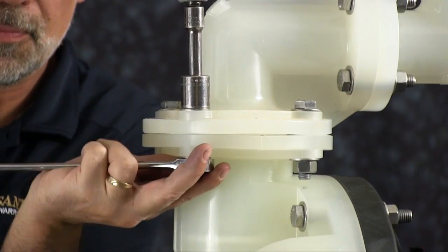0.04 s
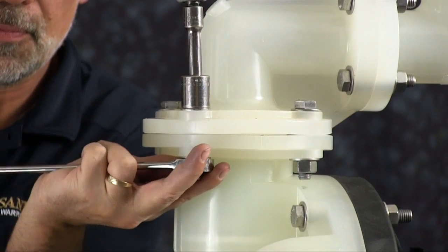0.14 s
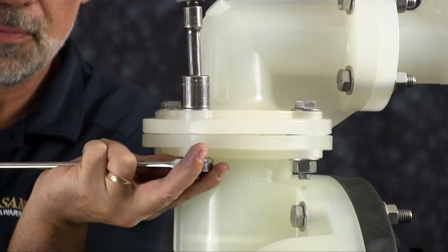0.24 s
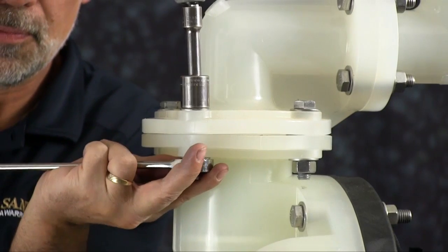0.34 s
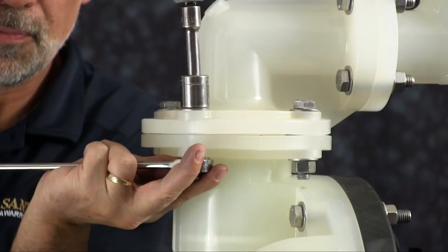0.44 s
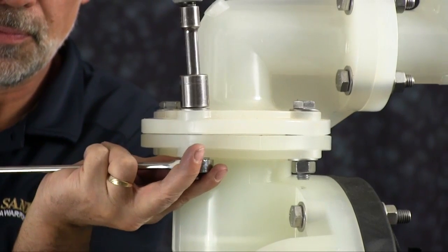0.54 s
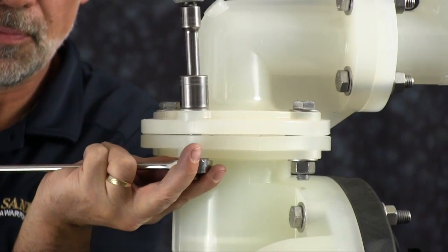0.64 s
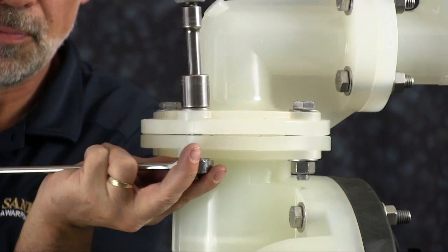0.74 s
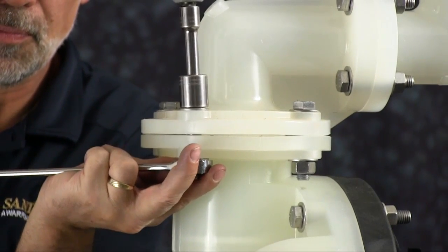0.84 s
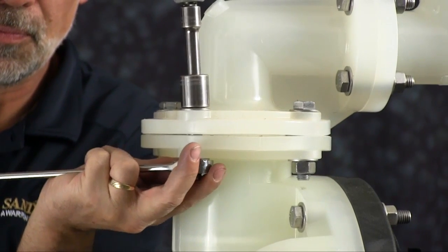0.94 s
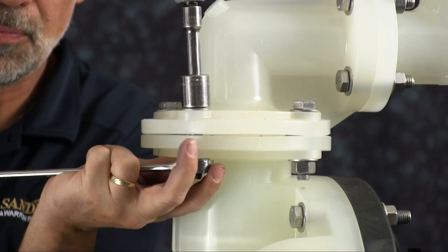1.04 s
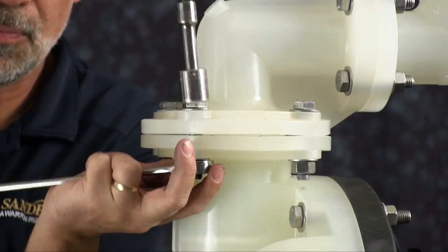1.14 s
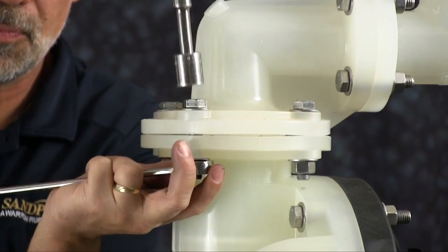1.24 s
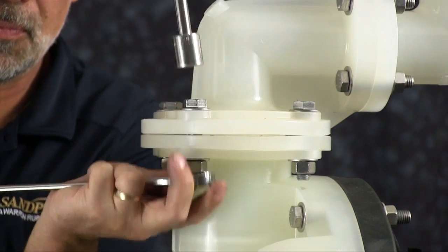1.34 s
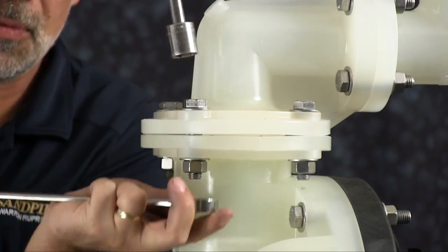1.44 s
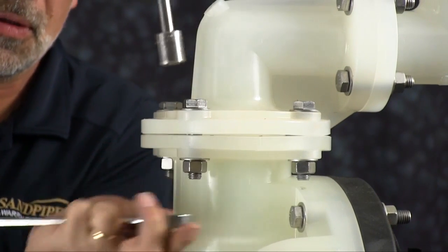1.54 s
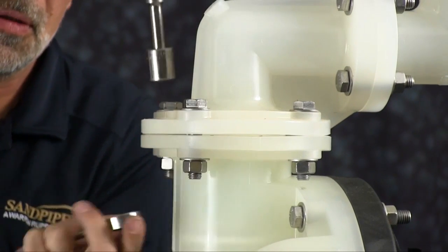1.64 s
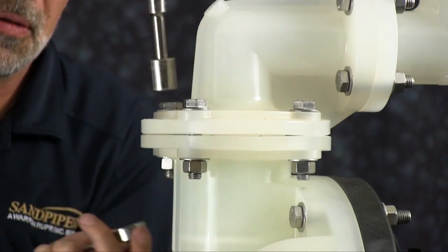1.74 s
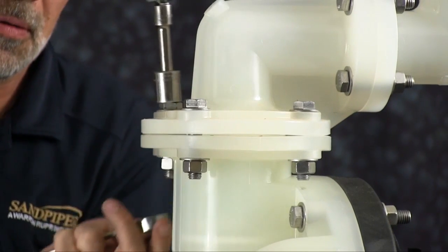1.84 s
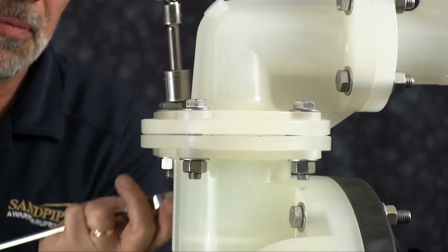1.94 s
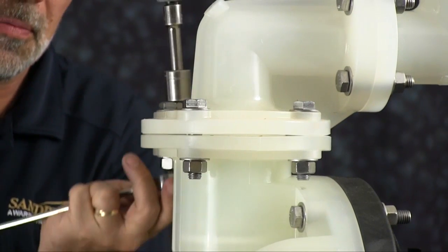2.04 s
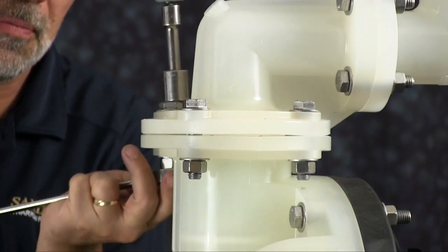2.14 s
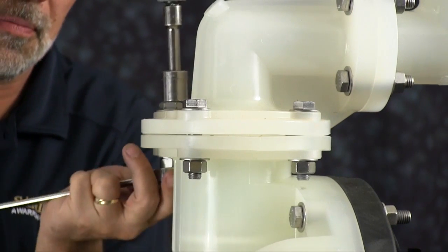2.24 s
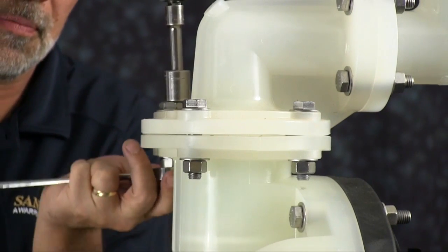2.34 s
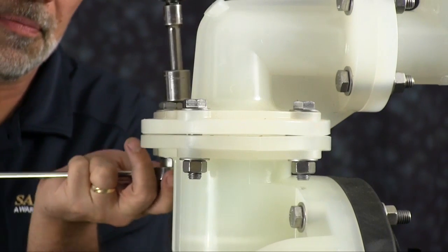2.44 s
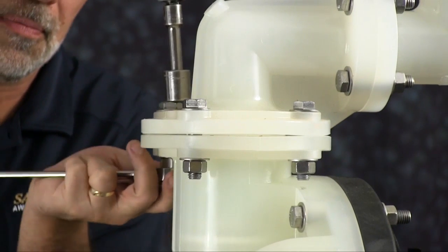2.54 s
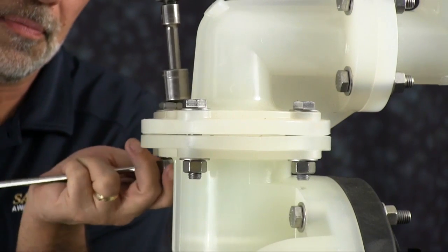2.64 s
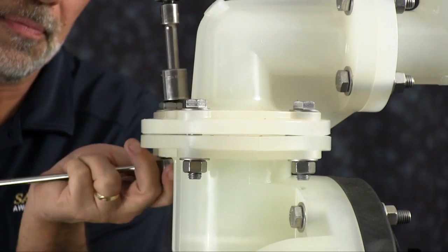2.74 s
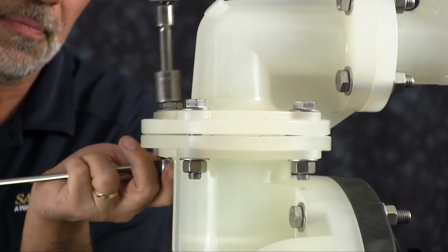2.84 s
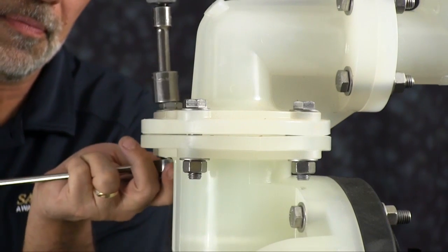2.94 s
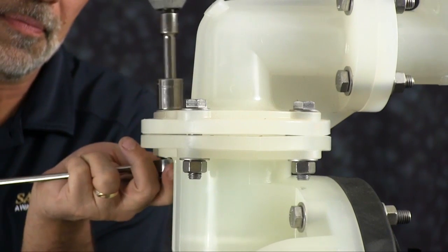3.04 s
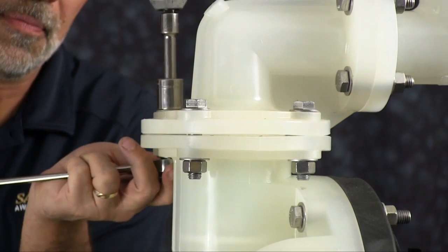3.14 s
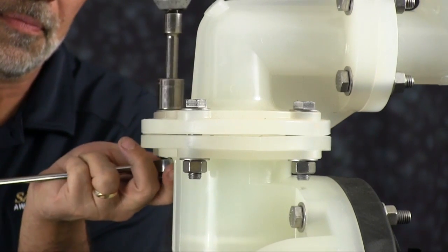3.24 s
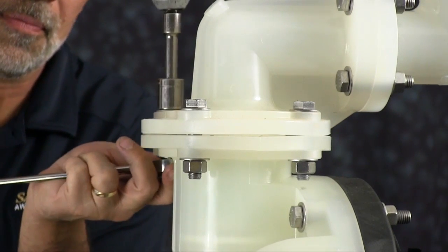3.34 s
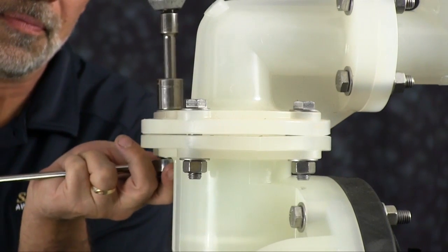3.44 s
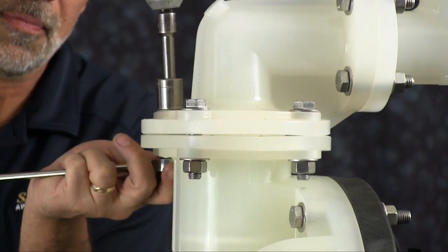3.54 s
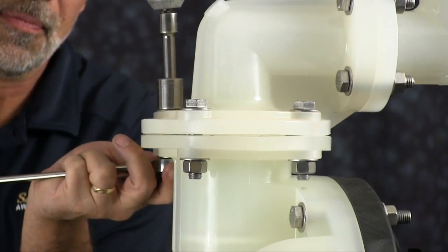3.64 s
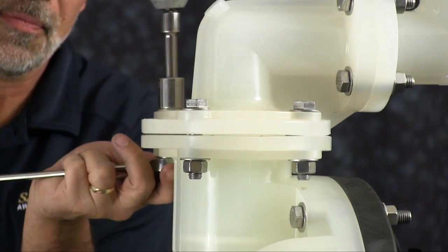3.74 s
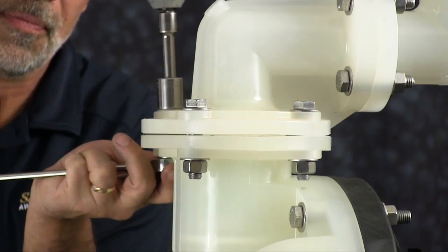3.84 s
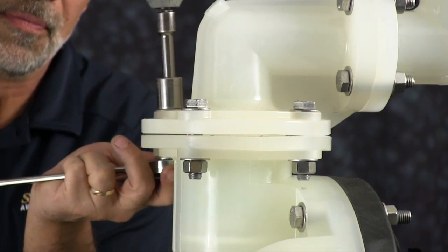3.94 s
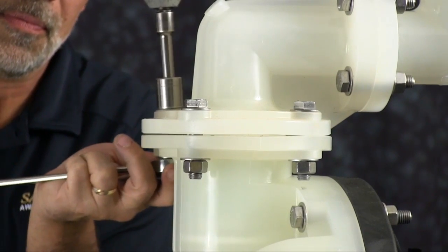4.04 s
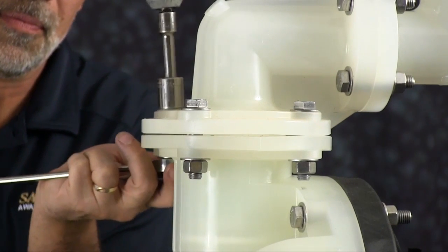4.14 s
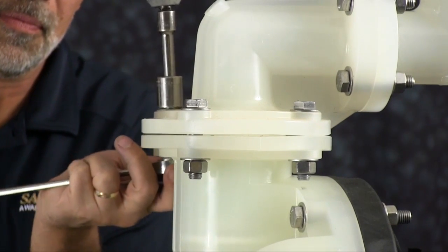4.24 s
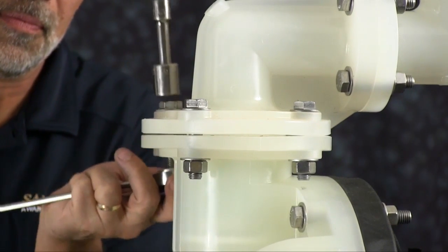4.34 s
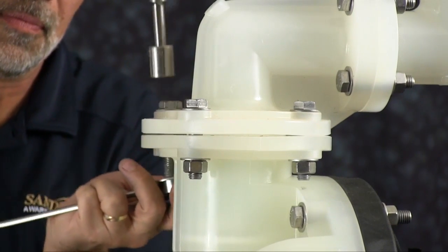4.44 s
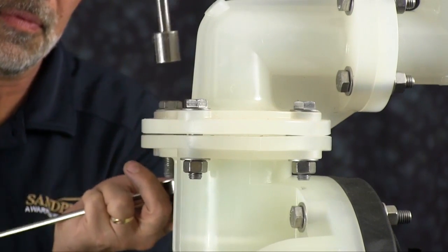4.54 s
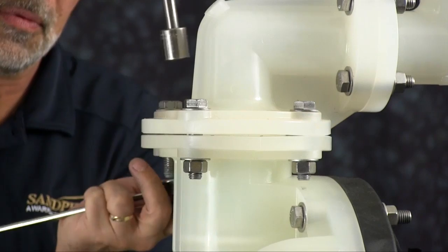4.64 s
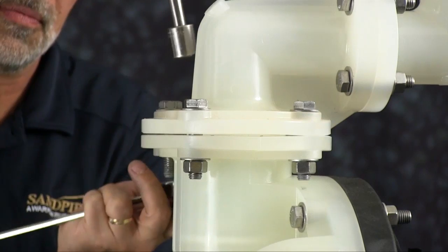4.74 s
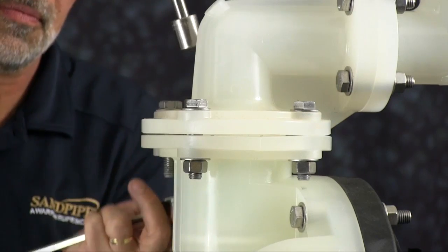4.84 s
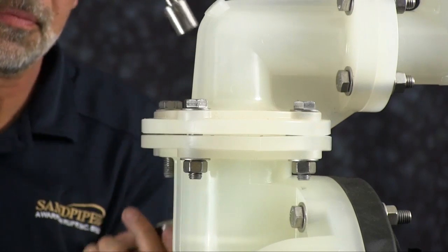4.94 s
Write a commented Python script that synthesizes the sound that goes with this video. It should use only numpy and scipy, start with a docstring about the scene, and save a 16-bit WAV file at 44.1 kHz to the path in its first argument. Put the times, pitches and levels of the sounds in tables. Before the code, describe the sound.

A small workshop, heard close, with faint bass rumble and short echo. A brief scrape and dull steel knocks come at 0-0.4 s. From about 0.4 s a cordless impact wrench rattles and hammers around 45 blows per second, loud, hard and metallic, ringing through the socket and plastic housing. After 0.74 s the beat breaks into irregular clanging blows over gear rattle and a faint whine, stopping just after 1.0 s. Light taps follow, then a strong hollow plastic thunk near 1.98 s and a spanner clink at 2.2 s. Small fumbling touches lead to a cluster of knocks and short scrapes at 2.75-3.2 s. At 3.58 s the wrench hammers again, more briefly, until 3.83 s, then spins with rattle, a few snags and a more audible high whine that sinks after 4.15 s. Knocks and tiny bright clinks at 4.3-4.55 s fade into quiet rumble.

```python
"""Knocks of steel on steel come first, over the faint rumble of a small workshop.
Then a cordless impact wrench loosens two bolts on the flange of a plastic pump. Twice it rattles, hammers
about 45 times a second, and whines and rattles as the nut spins off. In between, socket and spanner knock,
scrape and clink. Blows and knocks are short noise bursts, rattle and scrapes are crowds of tiny random
contacts, the whine and the clinks are sines, and steel and plastic are sets of resonances."""
import sys
import numpy as np
from scipy import signal
from scipy.fft import rfft, irfft, next_fast_len
from scipy.io import wavfile
from scipy.ndimage import uniform_filter1d, minimum_filter1d

SR = 44100
rng = np.random.default_rng(int(sys.argv[2]) if len(sys.argv) > 2 else 0)


def transcribe(u):
    """Save the signal u as a 16-bit wav file named by the first command-line argument.

    u: samples, shape (n,) or (channels, n), limited to [-1, 1]; the rate is SR.
    q: integer samples, one column per channel.
    """
    v = np.clip(np.atleast_2d(u).T, -1, 1)
    q = np.round(v * 32767).astype(np.int16)
    wavfile.write(sys.argv[1], SR, q)


N = 220639
TIME = np.arange(N) / SR   # seconds


def from_db(db):
    """Turn decibels into a gain."""
    return 10 ** (np.asarray(db) / 20)


def rms_one(x):
    """Scale a sound to an rms level of 1."""
    return x / np.sqrt(np.mean(x ** 2) + 1e-20)


def at_hz(points, hz):
    """Read a table between its points, along a logarithmic pitch axis."""
    table = np.array(points)
    return np.interp(np.log(np.maximum(hz, 1)), np.log(table[:, 0]), table[:, 1])


def colour(x, spectrum):
    """Give a sound a spectrum with a minimum-phase filter, which never sounds before its input."""
    size = 2 * next_fast_len(x.shape[-1])
    hz = np.arange(size // 2 + 1) * SR / size
    cepstrum = irfft(np.log(from_db(at_hz(spectrum, hz))))
    # folding the cepstrum onto its first half makes the filter minimum-phase
    cepstrum[1:size // 2] *= 2
    cepstrum[size // 2 + 1:] = 0
    response = np.exp(rfft(cepstrum))
    return irfft(rfft(x, size) * response)[..., :x.shape[-1]]


def resonance(x, hz, width_hz):
    """Ring at one pitch with gain 1 on top; a narrower resonance rings longer."""
    r = np.exp(-np.pi * width_hz / SR)
    feedback = [1, -2 * r * np.cos(2 * np.pi * hz / SR), r * r]
    return (1 - r * r) / 2 * signal.lfilter([1, 0, -1], feedback, x + 1e-18)


def body(force, modes):
    """An object passes on whatever shakes it and rings along."""
    return force + sum(from_db(level_db) * resonance(force, hz, width_hz) for hz, width_hz, level_db in modes)


def add(out, s, sound):
    """Mix a short sound in at time s."""
    at = max(round(s * SR), 0)
    out[at:at + len(sound)] += sound[:N - at]


def gate(start, end, fade_s):
    """1 between start and end, with sloping edges outside."""
    return np.interp(TIME, [start - fade_s, start, end, end + fade_s], [0, 1, 1, 0])


def since(s):
    """Seconds gone by since time s, 0 before it."""
    return np.maximum(TIME - s, 0)


def held(start, end, attack_s, release_s):
    """Rise in a straight line, hold, then fall off in a rounded curve."""
    return np.minimum(since(start) / attack_s, 1) * np.exp(-(since(end) / release_s) ** 2)


def wander(size):
    """Slow random drift of spread 1, averaged over size samples."""
    return rms_one(uniform_filter1d(rng.standard_normal(N), size=size))


def turning(hz, waver):
    """Angle of a shaft whose speed is slightly unsteady."""
    return 2 * np.pi * np.cumsum(hz * (1 + waver * wander(size=200))) / SR


def grains(per_s, spread_db):
    """Random tiny contacts of uneven strength and either sign."""
    strength_db = spread_db * np.minimum(rng.exponential(1, N), 4)
    sizes = from_db(strength_db) * rng.choice([-1, 1], N)
    return sizes * (rng.random(N) < per_s / SR)


def bursts(spectrum, decay_s, count, snap=0.57, size=2048):
    """One sharp snap and a fast-dying crowd of vibrations per contact, all rows of the same energy."""
    fade = np.exp(-np.arange(size) / SR / decay_s)
    dying = rng.standard_normal((count, size)) * fade
    dying[:, 0] = snap * np.linalg.norm(dying, axis=1)
    rows = colour(dying, spectrum)
    return rows / np.sqrt(np.sum(rows ** 2, axis=1, keepdims=True) / (SR * decay_s))


# the bright crack of steel on steel: pitch_hz [Hz], relative level_db [dB]
CRACK_SPECTRUM = [(1500, -21.5), (3000, -11), (4500, 7.5), (6000, 2.5), (8000, -3), (11000, -8),
                  (13500, -18.5), (16000, -30)]


def strikes(rows, thud_spectrum, thud_s, thud_db, crack_s, crack_db, delay_s):
    """Each contact is a thud with a crack of steel on steel; it starts delay_s after the time in its row."""
    out = np.zeros(N)
    thuds = bursts(thud_spectrum, thud_s, count=len(rows))
    cracks = bursts(CRACK_SPECTRUM, crack_s, count=len(rows))
    for (s, level_db, treble_db, *_), thud, crack in zip(rows, thuds, cracks):
        contact = from_db(thud_db) * thud + from_db(treble_db + crack_db) * crack
        add(out, s + delay_s, from_db(level_db) * contact)
    return out


# the faint rumble of the room: pitch_hz [Hz], relative level_db [dB]
RUMBLE_SPECTRUM = [(12, -33), (20, -1.5), (65, 2), (104, -2.5), (193, -10.5), (319, -18.5), (698, -29.5),
                   (923, -31), (1150, -34), (1810, -35.5), (2390, -43), (2600, -43.5), (3840, -47),
                   (14700, -52.5), (16000, -55.5)]


def room_rumble(level_db=-39):
    """Steady noise, strongest in the bass."""
    return from_db(level_db) * rms_one(colour(rng.standard_normal(N), RUMBLE_SPECTRUM))


# how long the workshop echoes: pitch_hz [Hz], time to fall by 60 dB t60_s [s]
ROOM_DECAY = [(150, 1), (700, 0.53), (2000, 0.33), (5500, 0.29), (14000, 0.31)]


def workshop(x, build_s=0.009, size=26000):
    """The room scatters sound into a tail of noise that dies at its own pace in each pitch band."""
    t, tail = np.arange(size) / SR, 0
    edges = np.geomspace(60, 17000, 9)   # Hz
    for low, high in zip(edges, edges[1:]):
        band_filter = signal.butter(2, [low, high], "band", fs=SR, output="sos")
        band = signal.sosfilt(band_filter, rng.standard_normal(size))
        t60_s = at_hz(ROOM_DECAY, np.sqrt(low * high))
        tail = tail + band * from_db(-60 * t / t60_s)
    tail = tail * (1 - np.exp(-t / build_s))   # the echoes need a moment to build up
    return signal.fftconvolve(x, tail / np.linalg.norm(tail))[:N]


# the spanner touches or leaves the nut: start_s [s], level_db [dB], pitch_hz around which it rings most [Hz]
SPANNER_CLINKS = [(2.212, -40.5, 4140), (4.335, -53, 10800), (4.453, -59, 10800), (4.495, -52, 10010),
                  (4.53, -50, 8480)]
# ways the spanner can ring: pitch_hz [Hz], level_db against the clink [dB], time to fall by 60 dB t60_s [s]
SPANNER_MODES = [(3052, -6, .15), (3600, -14, 0.34), (3690, 18.5, 0.038), (3920, -5, 0.1),
                 (5330, -0.5, 0.18), (5380, 4, 0.11), (7865, -8, 0.34), (10230, -17, 0.23),
                 (10440, -11, 0.17)]


def spanner(octave_db=55, size=22050):
    """The spanner rings in dying sines; each touch favours those near its own pitch."""
    out, t = np.zeros(N), np.arange(size) / SR
    for s, level_db, centre_hz in SPANNER_CLINKS:
        for hz, mode_db, t60 in SPANNER_MODES:
            height_db = level_db + mode_db - octave_db * np.log2(hz / centre_hz) ** 2
            add(out, s, from_db(height_db - 60 * t / t60) * np.sin(2 * np.pi * hz * t))
    return out


# steel slides over a bolt head: start_s [s], end_s [s], level_db [dB], brightest pitch_hz [Hz]
SCRAPE_TIMES = [(0.0, 0.01, -33.5, 1508), (1.457, 1.498, -54.5, 2470), (2.754, 2.776, -40.5, 1780),
                (2.953, 2.978, -42.5, 1790), (3.098, 3.16, -39.5, 1700), (3.121, 3.133, -37.5, 3694)]
# the sound of sliding: pitch_hz [Hz], relative level_db [dB]
SLIDING_SPECTRUM = [(150, -23), (700, 6.5), (1500, 0), (3500, -8.5), (6000, -14.5), (12000, -34.5)]


def scrapes(width_hz=1500):
    """Sliding steel catches and slips many times over."""
    slips = colour(grains(per_s=860, spread_db=1), SLIDING_SPECTRUM)
    out = np.zeros(N)
    for start, end, level_db, hz in SCRAPE_TIMES:
        scrape = rms_one(resonance(slips, hz, width_hz))
        out += from_db(level_db) * gate(start, end, fade_s=0.013) * scrape
    return out


# a rebound is weaker and duller than its knock
REBOUND_DB, REBOUND_TREBLE_DB = -4, -5.5
# a shaken flange makes the loose bolt chatter: gap between touches, level, loss per touch
CHATTER_S, CHATTER_DB, CHATTER_LOSS_DB = 0.041, -18, 4
# stray touches while the tools change bolts
FUMBLE_FROM_S, FUMBLE_TO_S, FUMBLE_DB = 2.4, 2.6, -44.5
# any light touch: share of treble, share that reaches the plastic
LIGHT_TREBLE_DB, LIGHT_PLASTIC_DB = -24, -10.5
# socket and spanner knock on bolt and flange: start_s [s], level_db [dB], share of treble treble_db [dB],
# share that reaches the plastic plastic_db [dB], gap before a rebound rebound_s [s, 0 for none]
TOOL_KNOCKS = [(0.013, -11, -27, -13.5, 0), (0.03, -18.5, -9, -12.5, 0.02),
               (0.219, -36.5, -45, -20, 0.0013), (0.361, -17, -23.5, -22.5, 0.025),
               (0.399, -11, -30, -18.5, 0), (1.207, -29, -21, -25, 0.002), (1.544, -40, -31, -15, 0),
               (1.766, -28.5, -22.5, -23.5, 0), (1.977, -8.5, -18, 4.5, 0.007), (2.174, -23.5, -33, 5, 0),
               (2.212, -18, -12.5, -12, 0.024), (2.471, -28, -34, -15.5, 0.028),
               (2.633, -36.5, -34, -13, 0), (2.752, -26, -42, -23, 0.0011),
               (2.777, -19.5, -24, -2.5, 0.0069), (2.94, -27.5, -39.5, -14, 0.0028),
               (2.989, -24.5, -3.5, -22, 0), (2.995, -8.5, -16.5, -13.5, 0.0052),
               (3.097, -24.5, -29, -6, 0.0022), (3.142, -14, -20.5, -16.5, 0.011),
               (3.17, -16, -22, -16, 0.00072), (3.211, -20, -25.5, -25, 0.00085),
               (3.345, -29, -26, -20, 0.019), (3.56, -19, -31, -16.5, 0.00029), (3.574, -11.5, -28, -13, 0),
               (4.331, -24.5, -25, -29, 0.002), (4.438, -16.5, -17, -7, 0.014)]


def contacts(count=8):
    """Knocks, rebounds, chatter and a few stray touches: (start_s, level_db, treble_db, plastic_db)."""
    rows = []
    for s in rng.uniform(FUMBLE_FROM_S, FUMBLE_TO_S, count):
        rows.append((s, FUMBLE_DB + 2 * rng.standard_normal(), LIGHT_TREBLE_DB, LIGHT_PLASTIC_DB))
    for s, level_db, treble_db, plastic_db, rebound_s in TOOL_KNOCKS:
        rows.append((s, level_db, treble_db, plastic_db))
        if rebound_s > .003:   # shorter gaps get no rebound of their own
            rows.append((s + rebound_s, level_db + REBOUND_DB,
                         treble_db + REBOUND_TREBLE_DB, LIGHT_PLASTIC_DB))
        for k in range(1, 4):
            chatter_db = level_db + plastic_db + CHATTER_DB - k * CHATTER_LOSS_DB
            rows.append((s + k * CHATTER_S, chatter_db, LIGHT_TREBLE_DB, LIGHT_PLASTIC_DB))
    return rows


# the dull part of a knock: pitch_hz [Hz], relative level_db [dB]
KNOCK_SPECTRUM = [(80, -15.5), (170, -3.5), (350, -11), (750, -4.5), (1200, 3.5), (1900, -3.5),
                  (2800, -5.5), (4000, -15), (8000, -53.5)]


def knocks(touches):
    """Steel lands on steel with a short thud and crack."""
    return strikes(touches, KNOCK_SPECTRUM, thud_s=0.0056, thud_db=-13.0,
                   crack_s=0.0052, crack_db=-10, delay_s=0.00083)


# resonances of the flange when steel lands on it: pitch_hz [Hz], width_hz [Hz], level_db [dB]
FLANGE_MODES = [(155, 19, 7.5), (293, 57, -3.5), (708, 14, 8), (738, 28, 14), (855, 38, 4), (1850, 110, 5),
                (1760, 80, 4.5), (2546, 100, -10.5)]


def thunks(touches, push_db=21, contact_s=.0001):
    """A knock on the flange gives it one soft push, and the plastic answers with a hollow thunk."""
    force, push = np.zeros(N), np.exp(-np.arange(128) / SR / contact_s)
    for s, level_db, _, plastic_db in touches:
        add(force, s, from_db(level_db + plastic_db + push_db) * push / push.sum())
    return body(force, FLANGE_MODES) - force   # only the ringing, without the push itself


# resonances of the plastic housing: pitch_hz [Hz], width_hz [Hz], level_db [dB]
HOUSING_MODES = [(175, 6, -5), (215, 29, 2.5), (510, 79, 0.5), (671, 31, 7), (792, 63, -3),
                 (1625, 450, -17), (2005, 110, -4)]


def housing(force):
    """The plastic housing passes on what shakes it and resonates along."""
    return body(force, HOUSING_MODES)


# a snag briefly brakes the spinning motor (length, share of speed lost) and adds rattle
SNAG_S, SNAG_SLOWING, SNAG_RATTLE_DB = 0.017, 0.03, 4.5
# single blows outside the beat, as the socket takes hold or the thread snags:
# start_s [s], level_db [dB], share of treble treble_db [dB], share of socket clang clang_db [dB]
SNAG_BLOWS = [(0.435, -5.5, -30, -10.5), (0.452, -3, -26, -11), (0.753, -6, -12, -2.5),
              (0.782, -7, -9.5, 1.5), (0.814, -1.5, -14, -3), (0.841, -6, -18, -9), (0.908, -4, -11.5, -20),
              (1.031, -1.5, -12.5, -2), (3.62, -3.5, -19, -14.5), (3.631, -3.5, -5.5, -8.5),
              (3.876, 0, -11, -14.5), (3.972, -17.5, -15, -18), (4.057, -16, -11, -14),
              (4.152, -10.5, -13, -3)]


def drag(lag_s=.009):
    """How hard the thread is snagging, 0-1: a rounded bump around a moment lag_s after each snag."""
    bumps = sum(np.exp(-((TIME - s - lag_s) / SNAG_S) ** 2) for s, *_ in SNAG_BLOWS)
    return np.minimum(bumps, 1)


# gear rattle: level under load, surge after the trigger is pressed and its length, attack, release
LOADED_DB, SURGE_DB, SURGE_S, ATTACK_S, RELEASE_S = -28, 10, 0.14, 0.04, 0.058
# chattering gears: pitch_hz [Hz], relative level_db [dB]
GEAR_SPECTRUM = [(40, -5), (70, 8.5), (130, -4.5), (230, -4.5), (360, -6.5), (700, -8), (950, -4.5),
                 (1400, 6), (2000, 0.5), (3000, -2), (5000, -12.5), (7500, -20), (11000, -32.5),
                 (16000, -54.5)]
# one pull of the trigger per bolt: pressed_s [s], nut free_s [s], let_go_s [s],
# rattle while spinning rattle_db [dB], whine_db [dB]
TRIGGER_PULLS = [(0.392, 0.87, 1.025, -28.5, -50), (3.578, 3.85, 4.145, -24.5, -31.5)]


def gear_rattle(wobble=0.41, wobble_hz=95):
    """Gears and the loose socket chatter while the trigger is pulled, throbbing as the socket wobbles."""
    drive, snag_db = 0, SNAG_RATTLE_DB * drag()
    for pressed, free, let_go, spinning_db, _ in TRIGGER_PULLS:
        loaded_db = LOADED_DB + SURGE_DB * np.exp(-(since(pressed) / SURGE_S) ** 2)
        level_db = np.where(TIME < free, loaded_db, spinning_db + snag_db)
        drive = drive + held(pressed, let_go, ATTACK_S, RELEASE_S) * from_db(level_db)
    throb = 1 + wobble * np.sin(turning(wobble_hz, waver=0.068))
    chatter = colour(throb * grains(per_s=6000, spread_db=3.0), GEAR_SPECTRUM)
    return drive * rms_one(chatter)


# the motor: free speed in turns per s, share of it missing as the nut comes free
MOTOR_HZ, SPIN_UP_SHARE = 384.5, 0.11
# time to make that share up, time to coast down
SPIN_UP_S, COAST_S = 0.07, 0.16
# tones of motor and gear teeth: multiple of the motor speed [times], level_db [dB]
MESH_TONES = [(4, -6.5), (5, -8), (8, -1.5), (10, 2.5), (16, -16.5)]
# the shaking pump: pitch_hz [Hz], relative level_db [dB]
SHAKE_SPECTRUM = [(20, -12), (45, 1), (70, 5.5), (120, -5.5), (220, -7), (400, -37.5)]


def free_spin(flutter_db=1.0, whine_db=1.0, shake_db=2, swell_s=.13, fade_s=0.011):
    """Tones follow the motor speed and sink as the trigger is let go; the wobbling bolt shakes the pump."""
    out = 0
    shake = from_db(shake_db) * rms_one(colour(rng.standard_normal(N), SHAKE_SPECTRUM))
    braked = 1 - SNAG_SLOWING * drag()
    for _, free, let_go, _, level_db in TRIGGER_PULLS:
        spin_up = 1 - SPIN_UP_SHARE * np.exp(-since(free) / SPIN_UP_S)
        coast = np.exp(-since(let_go) / COAST_S)
        angle = turning(MOTOR_HZ * braked * spin_up * coast, waver=0.002)
        tones = np.zeros(N)
        for multiple, tone_db in MESH_TONES:
            tone_level = from_db(whine_db + tone_db + flutter_db * wander(size=500))
            tones += tone_level * np.sin(round(multiple) * angle)
        out = out + from_db(level_db) * held(free, let_go, swell_s, fade_s) * (tones + shake)
    return out


# the beat: blows per second once up to speed, how many blows getting there takes
HAMMER_PER_S, RUN_UP_BLOWS = 45.45, 1.1
# a steady blow: level, weakening as the nut eases, share of treble
BLOW_DB, EASING_DB_PER_S, BLOW_TREBLE_DB = 0, 7, -16
LOOSE_CLANG_HZ = 1680   # pitch of the clang when the socket sits loose on the bolt
# the hammer beats against a tight nut: first blow start_s [s], end_s [s],
# time lost getting up to speed lost_s [s], first blow against the rest first_db [dB],
# share of socket clang clang_db [dB], clang pitch_hz [Hz]
HAMMER_RUNS = [(0.4256, 0.74, 0.015, 2, -11, 1340), (3.593, 3.825, 0.0215, -6, -5, 1220)]


def hammer_blows(scatter_db=0.5, clang_scatter_db=2, count=16):
    """A beat that starts slow and weakens, plus snags: (start_s, level_db, treble_db, clang_db, clang_hz)."""
    rows = [(*snag, LOOSE_CLANG_HZ) for snag in SNAG_BLOWS]
    k = np.arange(count)
    for first, end, lost_s, first_db, clang_db, clang_hz in HAMMER_RUNS:
        times = first + k / HAMMER_PER_S + lost_s * (1 - np.exp(-k / RUN_UP_BLOWS))
        levels = BLOW_DB - EASING_DB_PER_S * (times - first) + first_db * (k == 0)
        chance = rng.standard_normal((count, 3))   # no two blows are quite alike
        for s, level_db, (force, edge, seat) in zip(times, levels, chance):
            if s < end:
                rows.append((s, level_db + scatter_db * force, BLOW_TREBLE_DB + scatter_db * edge,
                             clang_db + clang_scatter_db * seat, clang_hz))
    return rows


def socket_clang(blows, push_db=30, width_hz=220, size=2048):
    """The harder a blow throws the socket against the bolt head, the louder the pair clangs."""
    out, click = np.zeros(N), signal.unit_impulse(size)
    for s, level_db, _, clang_db, hz in blows:
        # two resonances in a row give the clang a soft start
        ring = resonance(resonance(click, hz, width_hz), hz, 4 * width_hz)
        add(out, s + 0.00086, from_db(level_db + clang_db + push_db) * ring)
    return out


# the dull part of a hammer blow: pitch_hz [Hz], relative level_db [dB]
BLOW_SPECTRUM = [(60, -12.5), (200, -16.5), (380, -15.5), (700, -7), (980, -9.5), (1250, -2.5),
                 (1700, -5.5), (2500, -4.5), (3500, -10.5), (5000, -21), (9000, -39.5)]
# resonances of anvil, extension and socket: pitch_hz [Hz], width_hz [Hz], level_db [dB]
TOOL_MODES = [(1234, 130, 5.5), (1535, 550, 4.5), (2900, 210, 5), (3800, 470, 1), (4970, 89, -2.5),
              (5400, 230, -11), (6740, 350, -4), (10540, 300, -3)]


def hammer(blows):
    """Each blow is a thud and a crack that ring through anvil, extension and socket."""
    hits = strikes(blows, BLOW_SPECTRUM, thud_s=0.0026, thud_db=-12.0,
                   crack_s=0.0026, crack_db=-2.5, delay_s=.0012)
    return body(hits, TOOL_MODES)


def scene(wrench_wet_db=-12.5, handling_wet_db=-14.5):
    """Hammer, clang, rattle, knocks and scrapes also shake the housing; the room answers the tools."""
    blows, touches = hammer_blows(), contacts()
    wrench = housing(hammer(blows) + socket_clang(blows) + gear_rattle()) + free_spin()
    handling = housing(knocks(touches) + scrapes()) + thunks(touches) + spanner()
    room = workshop(from_db(wrench_wet_db) * wrench + from_db(handling_wet_db) * handling)
    return (wrench + handling + room + room_rumble())[None]


def record(dry, cutoff_hz=16000):
    """A fast limiter holds the hardest blows at full scale; then the top is cut."""
    gain = minimum_filter1d(1 / np.maximum(np.abs(dry), 1), size=31)
    limited = dry * uniform_filter1d(gain, size=31)
    low_pass = signal.ellip(12, .1, 95, cutoff_hz, fs=SR, output="sos")
    return signal.sosfilt(low_pass, limited)


dry = scene()
out = record(dry)
transcribe(out)
```